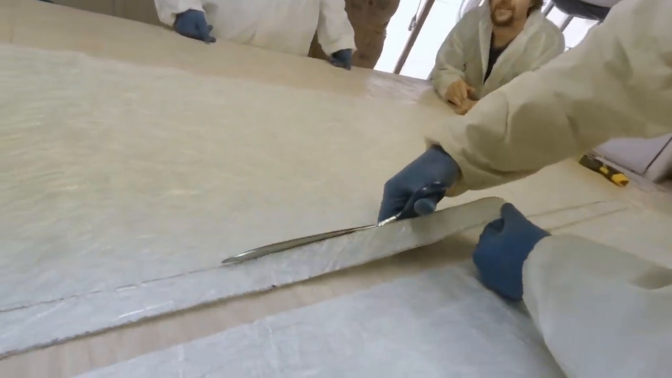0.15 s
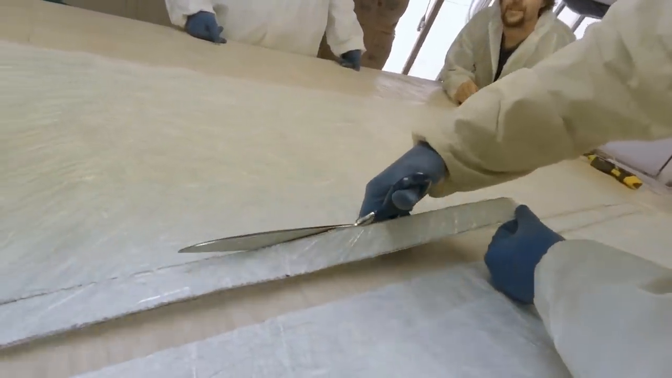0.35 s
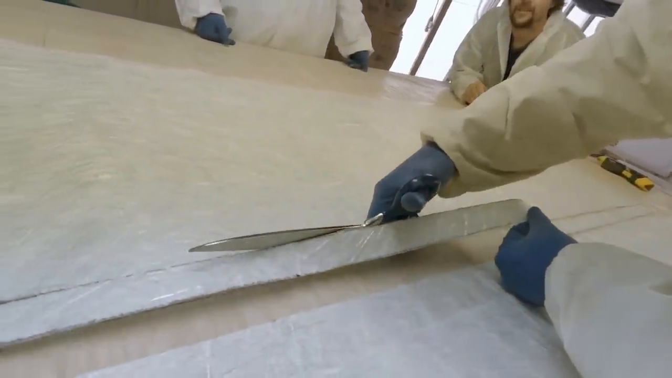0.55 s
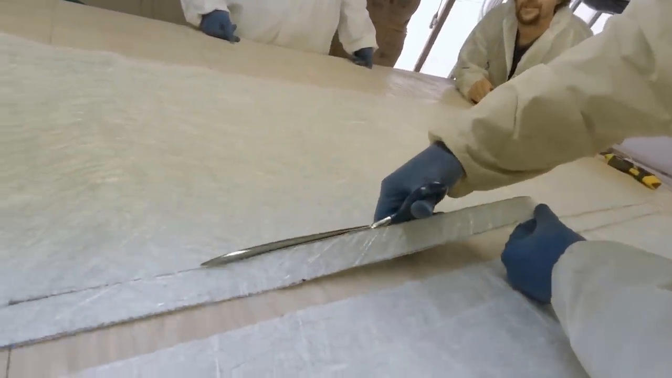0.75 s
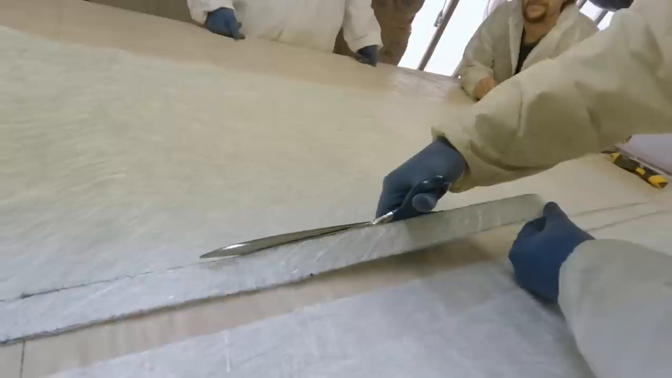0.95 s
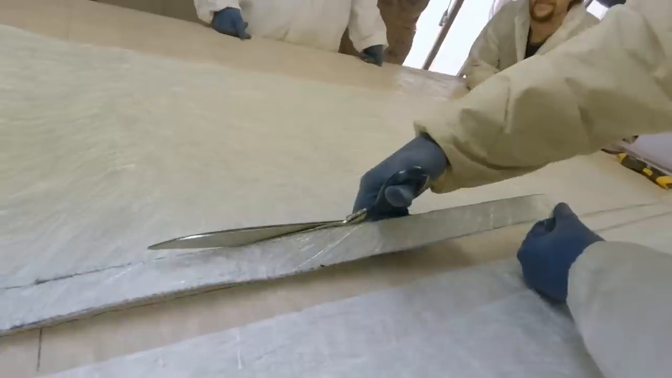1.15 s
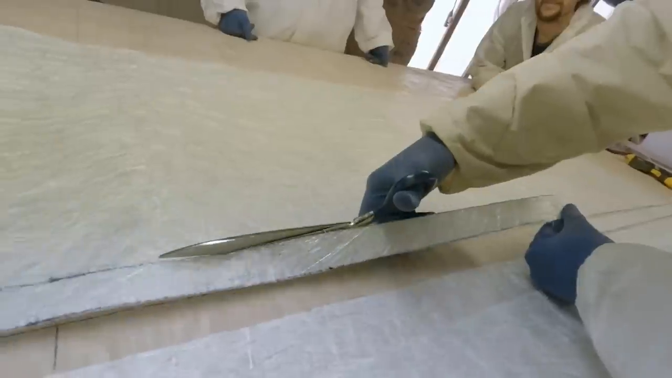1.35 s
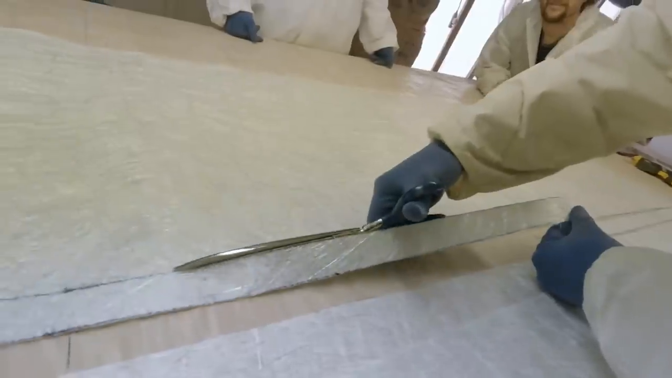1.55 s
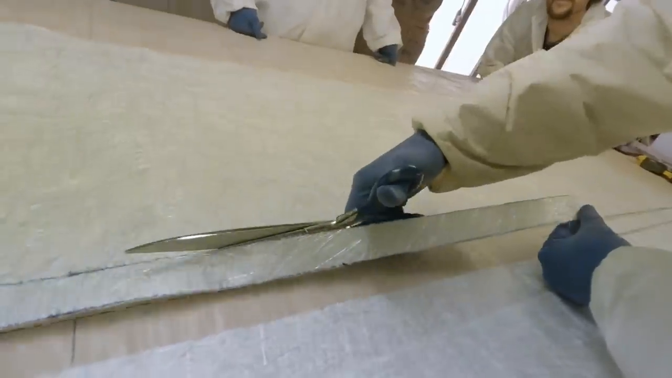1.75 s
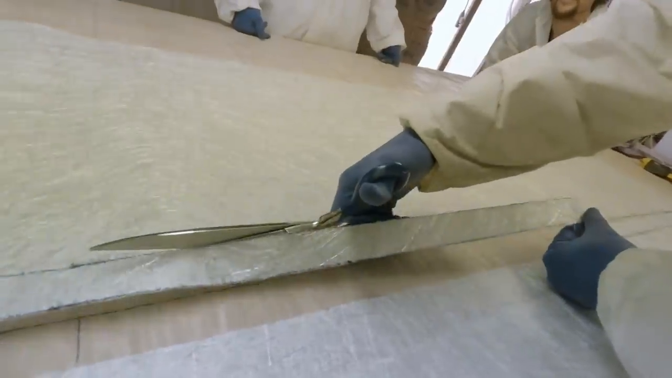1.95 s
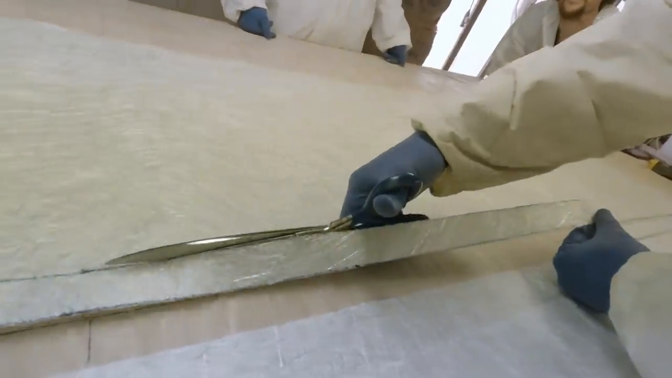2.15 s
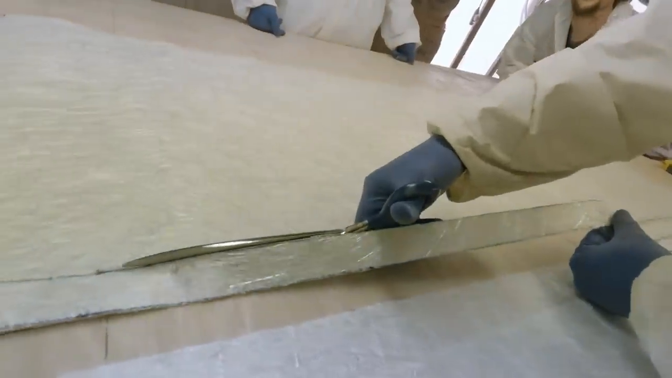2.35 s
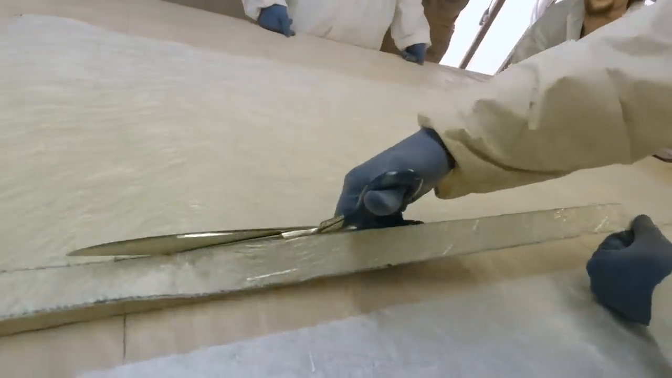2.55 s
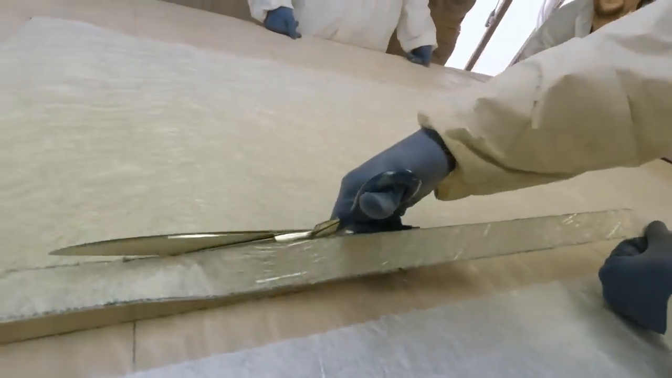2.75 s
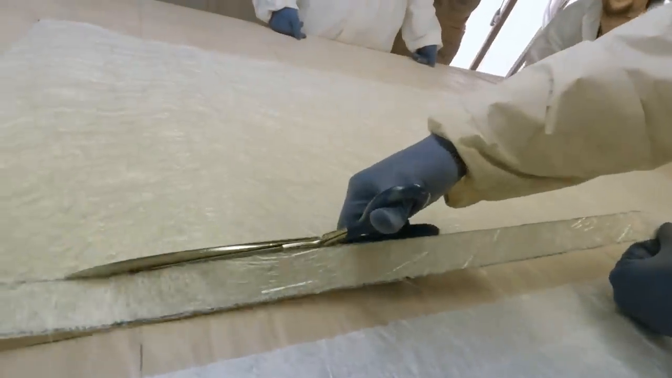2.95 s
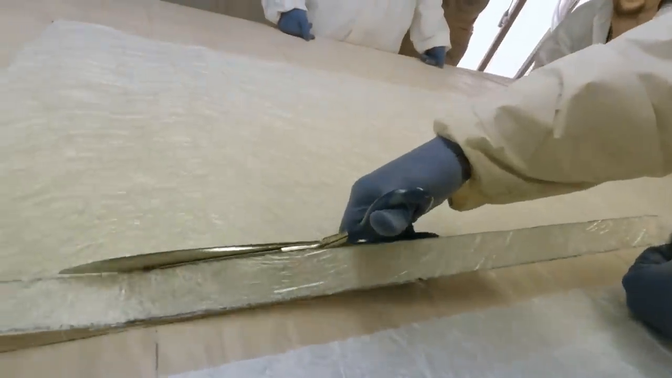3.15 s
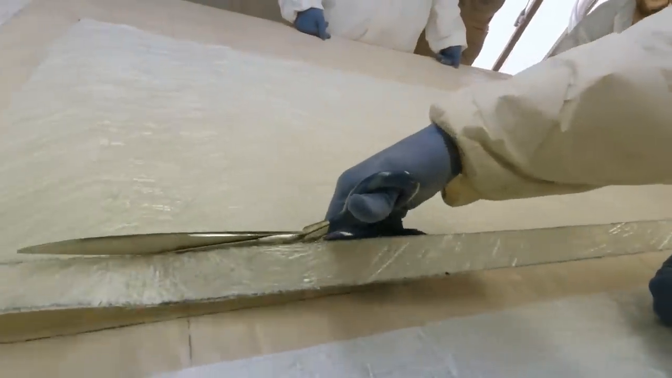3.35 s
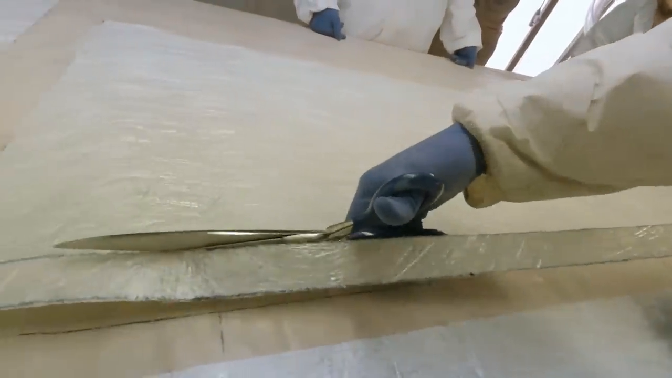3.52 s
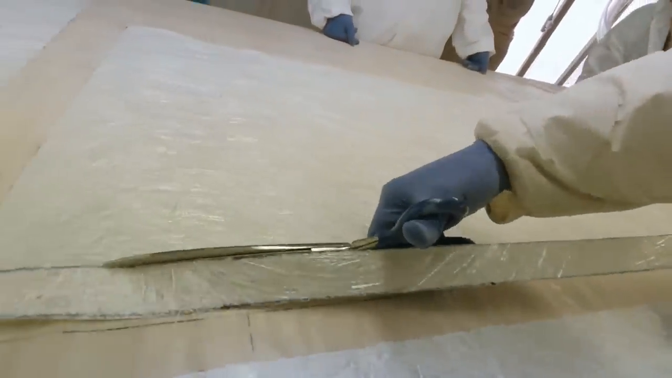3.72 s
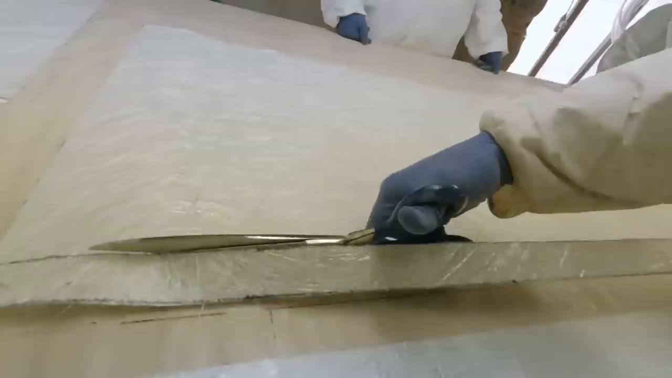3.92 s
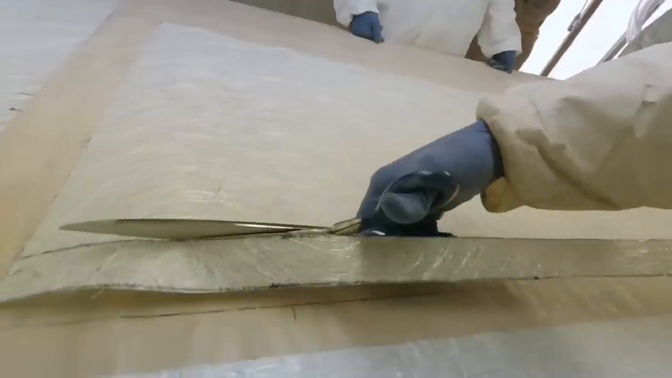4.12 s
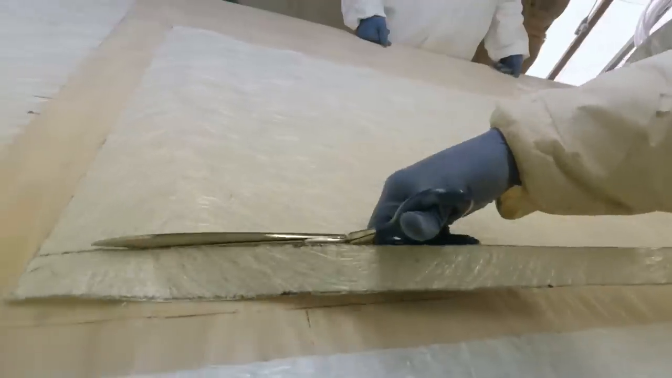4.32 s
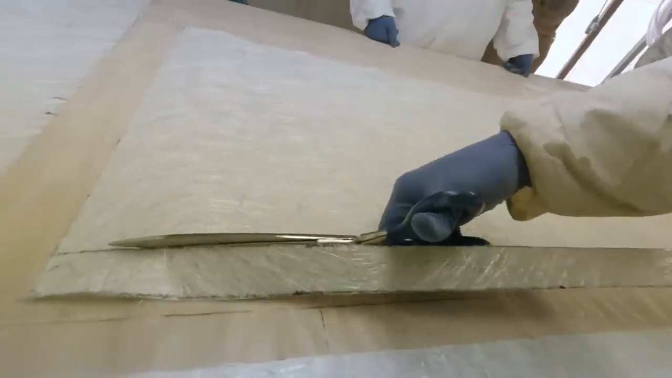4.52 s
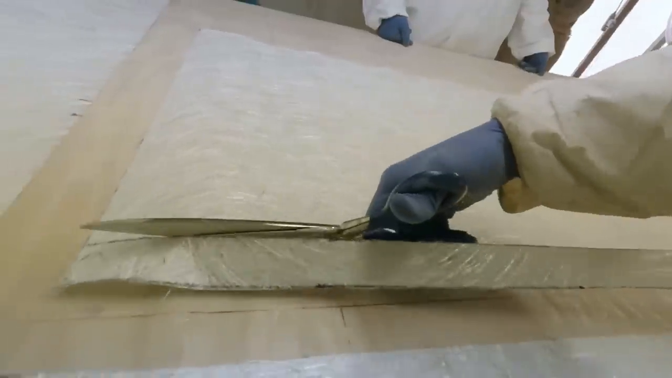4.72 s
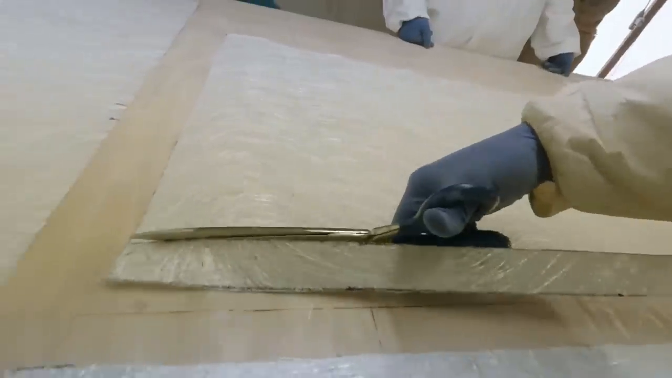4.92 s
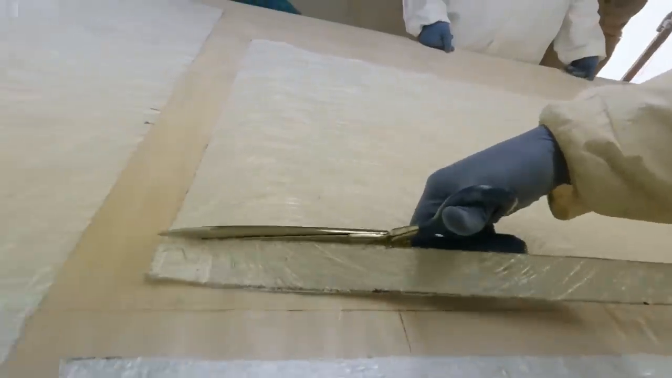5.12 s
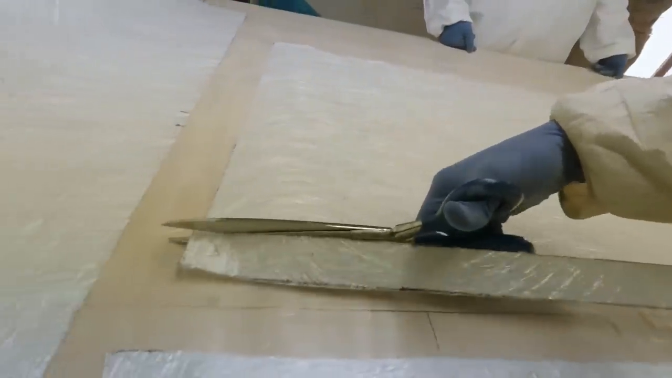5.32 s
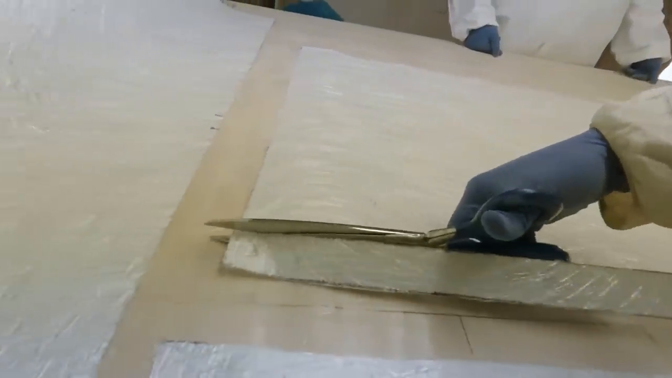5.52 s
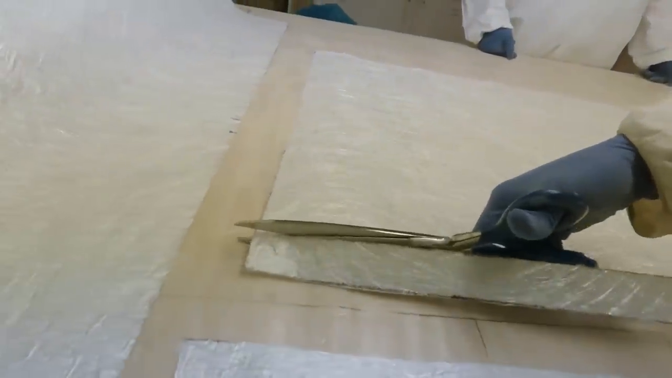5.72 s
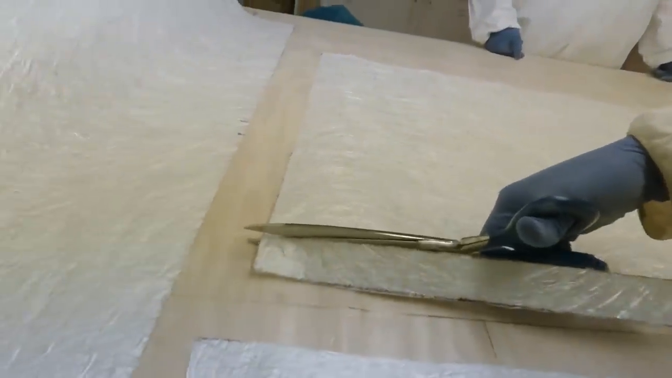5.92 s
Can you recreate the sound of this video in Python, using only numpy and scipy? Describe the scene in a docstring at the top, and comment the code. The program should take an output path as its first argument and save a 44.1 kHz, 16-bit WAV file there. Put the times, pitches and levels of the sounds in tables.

```python
"""Shears cutting a glass-fibre mat

Large tailor's shears cut a strip from a mat lying on a wooden work table, over the low rumble of a shed.
Cutting: showers of random clicks, shaped into crunches, ring in filter banks for blades, mat and table top.
Between strokes the shears open with a hiss and a fading song (denser clicks) and drag over the table.
Knocks and the closing slam, on which the sound ends, are dying sines; ticks and rumble are coloured noise."""
import sys
import numpy as np
from scipy import signal
from scipy.fft import rfft, irfft
from scipy.io import wavfile
from scipy.ndimage import uniform_filter1d, map_coordinates

SR = 44100
rng = np.random.default_rng(int(sys.argv[2]) if len(sys.argv) > 2 else 0)


def generate_wav(sig):
    """Save sig (samples, or channels by samples) to the path in sys.argv[1] as 16-bit PCM at SR."""
    pcm = np.round(np.clip(np.atleast_2d(sig).T, -1, 1) * 32767).astype(np.int16)
    wavfile.write(sys.argv[1], SR, pcm)


N = 267687
TIME = np.arange(N) / SR

# closing strokes, the crossing point of the blades running from pivot to tip:
# (start t/s, end t/s, relative fraying level/dB, push on the table re the cut/dB)
STROKES = [(-.2, 0.035, -41, 1.5), (0.571, 0.788, -43.5, 1), (1.324, 1.468, -43, 4),
           (2.061, 2.246, -42.5, 5), (2.782, 2.987, -43.5, 7), (3.536, 3.693, -43.5, -1),
           (4.246, 4.401, -42.5, -7.5), (4.879, 4.947, -41.5, -13.5), (5.869, 6.035, -46.5, -6)]
# resonances of the table top: (f/Hz, width/Hz, relative level/dB)
TABLE = [(142.4, 12.5, -8.5), (209, 33, 1), (268.8, 34, -0.5), (389, 112, -12.5)]
# spectrum of a bright snap: (f/Hz, relative density/dB)
SNAP = [(1200, -34), (2200, 0.5), (4000, -2.5), (7000, -4.5), (9500, -4.5), (10400, -5), (12500, -7),
        (15500, -9)]


def cutting():
    """One shower of breaking filaments is heard directly and through blades, mat and table."""
    crackle, rasp, push = bundle_levels()
    snaps = grains(per_s=2200, spread_db=3.5)

    direct = from_db(-7.5) * colour(snaps, SNAP)
    bright = even(blades(snaps, flicker_db=4.5) + direct, span_s=0.009)
    board_hz, board_width_hz = 716.4, 48
    board = from_db(board_ring_db()) * resonate(snaps, [(board_hz, board_width_hz, 0)])
    middle = even(mat(snaps, flicker_db=2.5) + board, span_s=0.0056)
    low = even(resonate(snaps, TABLE), span_s=0.011)

    # the lower the band, the longer it lingers and the more it reverberates
    bright = from_db(1.1) * bright * linger(crackle, hold_s=0.00046)
    middle = from_db(-0.77) * middle * linger(rasp, hold_s=.0018)
    low = from_db(0.5) * low * linger(push, hold_s=0.0033)
    return (with_tail(bright, wet_db=-19, t60=0.18)
            + with_tail(middle, wet_db=-9, t60=0.19)
            + with_tail(low, wet_db=-5.5, t60=0.27))


def bundle_levels():
    """Crunches stand over a bed of small bundles fraying; returns strengths of crackle, rasp and push."""
    # thick bundles of fibres giving way; at 5.468 and 5.51 s a faint rustle as the shears shift:
    # (middle t/s, half-length/s, relative level/dB, brightness as crackle over rasp/dB)
    crunches = [(.005, 0.0072, -22, 2), (.018, .006, -28, 0), (0.628, .01, -26.5, 3),
                (0.676, 0.0058, -23, -2), (.72, 0.0073, -23, -5), (0.742, 0.0067, -27, -3),
                (.763, 0.0063, -31, -5), (0.791, 0.0041, -22, -4.5), (1.328, .006, -42, 3),
                (1.359, 0.0043, -33, -0.5), (1.395, 0.0081, -22.5, 2.5), (1.42, .005, -28.5, -4),
                (1.457, 0.011, -25.5, -1.5), (1.492, .008, -23, 1), (1.515, .006, -35, 8),
                (2.108, .006, -29, 0), (2.129, .012, -24, -0.5), (2.179, .009, -20, -1),
                (2.226, 0.0063, -23.5, -5.5), (2.252, 0.007, -26.5, 1.5), (2.279, .0055, -24.5, 0),
                (2.825, 0.01, -27, -2), (2.868, 0.0067, -21.5, 2), (2.93, 0.015, -24, 1.5),
                (2.963, 0.0037, -31, -2), (3.004, 0.0064, -24, 10.5), (3.034, .0075, -38, 6),
                (3.069, .003, -42, 6), (3.545, 0.0054, -34.5, 3), (3.585, 0.006, -31, -3),
                (3.599, 0.0061, -20.5, 1), (3.644, 0.015, -21.5, -2), (3.697, 0.0077, -17.5, -2),
                (4.254, 0.0057, -30.5, -4), (4.289, 0.0088, -22.5, 1), (4.329, 0.015, -24, -0.5),
                (4.361, 0.014, -25.5, -2), (4.394, .006, -26, -3), (4.42, 0.0064, -32, -4.5),
                (4.878, .005, -41, 5), (4.908, .009, -24.5, 3), (4.928, .01, -24, 2),
                (4.948, .008, -22.5, -6), (4.97, .005, -36, 12), (5.468, .006, -52, 10),
                (5.51, .017, -50, 6), (5.881, 0.008, -39, 2), (5.946, 0.0054, -35, -2),
                (5.967, .006, -26.5, -6.5), (6.02, 0.0064, -16.5, 1), (6.052, 0.0034, -22.5, 9)]
    attack_s, release_s = .01, .045   # small bundles fray for as long as the blades close
    fray_per_s, fray_spread_db, fray_hold_s = 150, 2.5, .004   # at random, of unequal size, dying quickly
    fray_bright_db = -3
    crackle_db, rasp_db = -3, 3   # re the level of the cut
    lopsided = .12   # a crunch dies away more slowly than it builds up

    fray = 0
    for start, end, fray_db, _ in STROKES:
        before, after = np.maximum(start - TIME, 0), np.maximum(TIME - end, 0)
        closing = np.exp(-before / attack_s - after / release_s)
        fray = fray + shares(fray_db, fray_bright_db) * closing
    small_snaps = rms_one(linger(grains(fray_per_s, fray_spread_db), fray_hold_s))
    power = (fray * small_snaps) ** 2

    for s, half_length, db, bright_db in crunches:
        near = slice(*np.searchsorted(TIME, [s - 4 * half_length, s + 4 * half_length]))
        age = (TIME[near] - s) / half_length
        swell = np.exp(-(age * (1 - lopsided * np.sign(age))) ** 2)
        power[:, near] += shares(db, bright_db) ** 2 * swell

    crackle, rasp, push = np.sqrt(power)
    push_db = np.interp(TIME, stroke_times(), np.repeat([row[-1] for row in STROKES], 2))
    return from_db(crackle_db) * crackle, from_db(rasp_db) * rasp, from_db(push_db) * push


def shares(db, bright_db):
    """Gains of crackle, rasp and push for this level and brightness, as a column."""
    return from_db([[db + bright_db / 2], [db - bright_db / 2], [db]])


def stroke_times():
    """Start and end of each closing stroke, in turn."""
    return np.ravel([row[:2] for row in STROKES])


def blades(snaps, flicker_db):
    """Which blade modes speak depends on where the edges cross; each also flickers at random."""
    # blade modes, driven differently along the edge:
    # (f/Hz, width/Hz, relative level near the pivot/dB, midway/dB, near the tip/dB)
    edge_modes = [(2336, 170, -19, -17, -8), (2930, 137, -1.5, -3.5, 5), (3700, 330, -2, -2, 3.5),
                  (4370, 170, -10, -5.5, 2), (5485, 470, -2.5, -12, -10), (6350, 140, -3, 4.5, -3.5),
                  (6970, 124, 6, -8.5, -2), (7750, 270, 6, -3.5, 1), (8540, 190, 8.5, 5.5, 4),
                  (8990, 130, 3.5, 5, -2), (9580, 270, -11, -7, -6), (10750, 150, -6, 2.5, -15),
                  (11430, 310, -4.5, -2, -16), (13140, 160, -12, 10, -3), (13400, 230, -8, -1, -6),
                  (13920, 280, 5, 9, -5)]
    travel = np.interp(TIME, stroke_times(), np.tile([0, 1], len(STROKES)))   # 0 pivot, 1 tip
    out = 0
    for k, (hz, width, *along_db) in enumerate(edge_modes):
        db = np.interp(travel, np.array([1, 3, 5]) / 6, along_db)
        gain = (-1) ** k * from_db(db + flicker_db * drift(50)) * np.sqrt(width)
        out = out + gain * resonate(snaps, [(hz, width, 0)])
    return rms_one(out)


def mat(snaps, flicker_db):
    """The stretched mat's modes flicker at random; it is too light to radiate bass."""
    # resonances of the stretched mat: (f/Hz, width/Hz, relative level/dB)
    mat_modes = [(550.7, 48, 4.5), (771, 70, 1), (1045, 56, 3), (1177, 51, 2), (1286, 44, 2),
                 (1454, 66, -2), (1643, 85, -7), (1900, 165, -8.5)]
    out = 0
    for k, (hz, width, db) in enumerate(mat_modes):
        gain = (-1) ** k * from_db(db + flicker_db * drift(35)) * np.sqrt(width)
        out = out + gain * resonate(snaps, [(hz, width, 0)])
    low_hz = 490
    return rms_one(signal.sosfilt(signal.butter(4, low_hz, "high", fs=SR, output="sos"), out))


def board_ring_db():
    """How strongly the bare board answers the lower blade."""
    # the board drums more in the later cuts, as they near the edge of the mat: (t/s, level re the mat/dB)
    board_ring = [(0, -6.5), (2.9, -9.5), (3.6, 0.5), (4.3, 0.5), (4.95, 2.5), (6.0, -0.5)]
    return np.interp(TIME, *np.transpose(board_ring))


def sliding():
    """The blades part, singing at first and then rubbing with a hiss, while the lower one drags on the table."""
    # the shears open and slide on: (start t/s, end t/s, relative blade hiss/dB, relative table drag/dB)
    slides = [(0.147, 0.447, -43.5, -35), (0.927, 1.236, -43.5, -37), (1.634, 1.934, -44.5, -33),
              (2.418, 2.719, -45, -33), (3.118, 3.446, -47.5, -35.5), (3.83, 4.157, -46, -38.5),
              (4.535, 4.806, -49, -48), (5.106, 5.331, -51, -47.5)]
    # the bare edges catch and sing for a moment; at .086 s a small crunch:
    # (middle t/s, half-length/s, relative level/dB)
    catches = [(.086, 0.0053, -51), (1.005, 0.024, -48), (1.71, 0.027, -44.5), (1.87, 0.0087, -43.5),
               (2.488, 0.01, -40.5), (3.152, 0.0084, -42.5), (5.202, .014, -45.5)]
    # spectrum of the rubbing edges: (f/Hz, relative density/dB)
    hiss_spectrum = [(500, -20), (1000, -12), (1600, 0), (2300, -2), (4000, 3), (6000, 2.5), (9000, 1.5),
                     (10500, -2.5), (13500, -0.5), (15500, -4)]
    hiss_ramp_s, drag_ramp_s = 0.042, 0.091   # the hand gathers speed, holds it and slows again
    hiss_waver_db, drag_waver_db, wavers_per_s = 1, 2.5, 31   # the hand is never quite steady
    grit_db, grits_per_s = 1.5, 350   # glass dust between the blades roughens the rub
    board_follows = 0.32   # share of the board ring's dB that the sliding blade also brings out

    hiss, drag, opening = np.zeros((3, N))
    for start, end, hiss_db, drag_db in slides:
        hiss += from_db(hiss_db) * glide(start, end, hiss_ramp_s)
        drag += from_db(drag_db) * glide(start, end, drag_ramp_s)
        opening += ((TIME > start) & (TIME < end)) * (TIME - start) / (end - start)
    hiss *= from_db(hiss_waver_db * drift(wavers_per_s) + grit_db * drift(grits_per_s))
    drag *= from_db(drag_waver_db * drift(wavers_per_s))

    slips = grains(per_s=14000, spread_db=5.5)
    sung = np.clip(np.interp(opening, [.35, .65], [.45, .05]), 0, 1)   # share of power in the free modes

    # the edge's part of the rub comes and goes at random
    edge = resonate(grains(per_s=4000, spread_db=7.0), [(5340, 1100, 0), (7650, 1200, -1)])
    edge = from_db(-10 + 5.9 * drift(20)) * edge
    steel = from_db(-2.5) * hiss * np.sqrt(1 - sung) * (colour(slips, hiss_spectrum) + edge)

    brief = sum(from_db(db) * np.exp(-.5 * ((TIME - s) / half_length) ** 2)
                for s, half_length, db in catches)
    song_level = np.hypot(from_db(-3.5) * hiss * np.sqrt(sung), brief)
    song = song_level * singing(slips, opening, swell_db=6, wander=0.0098, sag=.022)

    board = resonate(slips, [(537, 84, -6), (719, 42, 6), (1055, 69, -4), (1254, 83, -8.5)])
    board = from_db(-2.0 + board_follows * board_ring_db()) * hiss * board
    table = even(resonate(grains(per_s=900, spread_db=3.5), TABLE), span_s=0.036)
    return steel + song + board + from_db(-1.0) * drag * table


def glide(start, end, ramp_s):
    """Speed of the hand, 0 to 1: a ramp up, a hold and a ramp down."""
    return np.clip(np.minimum(TIME - start, end - TIME) / ramp_s, 0, 1)


def singing(slips, opening, swell_db, wander, sag):
    """Free blade modes swell at random; their pitch wavers, and sags midway through each opening."""
    # the blades ringing freely, undamped by the mat: (f/Hz, width/Hz, relative level/dB)
    free_modes = [(2920, 50, -9), (4950, 90, -9), (6290, 87, -3), (8400, 70, 5), (9200, 130, 2.5),
                  (9800, 80, -5), (11750, 90, -0.5), (12850, 110, -6), (13330, 100, 0), (14030, 100, -2)]
    modes = sum(from_db(db + swell_db * drift(26)) * resonate(slips, [(hz, width, 0)])
                for hz, width, db in free_modes)
    bend = wander * drift(22) + sag * np.cos(2 * np.pi * opening)   # relative change of pitch
    position = np.arange(N) + np.cumsum(bend)
    return even(map_coordinates(modes, [position], order=3, mode="mirror"), span_s=0.033)


def bumps():
    """The shears knock on the table: soft blows set its top swinging for a few cycles."""
    # knocks: (t/s, relative level/dB, f/Hz, t60/s)
    knocks = [(0.1351, 0.5, 277, 0.029), (0.138, -24, 100, .15), (0.137, -16, 520, 0.055),
              (0.1502, -13.5, 199, 0.055), (0.153, -16, 422, 0.033), (0.164, -18, 228, .07),
              (0.173, -21.5, 464, 0.032), (1.047, -25.5, 232.4, 0.27), (1.621, -20, 115, 0.19),
              (1.85, -22.5, 237, 0.12), (2.381, -24, 104, 0.14), (3.067, -16, 112, 0.13),
              (5.039, -27.5, 108, 0.13), (5.505, -35, 270, .12)]
    blows = sum(from_db(db) * ring(s, hz, t60, rise_s=0.31 / hz) for s, db, hz, t60 in knocks)
    soft_hz = 950
    soft = signal.sosfilt(signal.butter(3, soft_hz, fs=SR, output="sos"), blows)
    return with_tail(soft, wet_db=-13.0, t60=0.21)


def slam():
    """With no mat left to brake them, the blades close hard on their stop and ring."""
    # the moment of closing: (t/s, level/dB)
    s, level_db = (6.0578, -2)
    # what rings: (f/Hz, relative level/dB, t60/s)
    stop_modes = [(97, -7.5, 0.35), (250, -13, .08), (420, -10, .06), (707, 0.5, 0.053), (1130, -6, 0.044),
                  (1390, -5.5, 0.088), (1850, 3, 0.051), (2303, 1.5, 0.048), (2940, -2.5, 0.029),
                  (3710, -5, 0.045), (4280, -3.5, 0.033), (5710, -13.5, 0.032), (8300, -4.5, 0.027),
                  (13000, -18, .02)]
    rings = sum((-1) ** k * from_db(db) * ring(s, hz, t60) for k, (hz, db, t60) in enumerate(stop_modes))
    return from_db(level_db) * rings


def ticks():
    """Single strands snap and the pivot ticks: bright noise clicks, a few milliseconds long."""
    # clicks: (t/s, relative level/dB)
    clicks = [(0.678, -14), (0.716, -19), (0.788, -16), (0.882, -39), (2.221, -17), (2.275, -20),
              (2.869, -22), (3.284, -28.5), (4.194, -33.5), (4.331, -16), (5.815, -36.5), (5.868, -26)]
    starts, decay_s = np.zeros(N), .003
    for s, db in clicks:
        starts[round(s * SR)] = from_db(db)
    level = signal.lfilter([1], [1, -np.exp(-1 / (decay_s * SR))], starts + 1e-18)
    return from_db(-10.0) * level * colour(rng.standard_normal(N), SNAP)


def shed():
    """The low rumble of the shed: steady noise, strongest in the bass."""
    # spectrum of the rumble: (f/Hz, relative density/dB)
    rumble_spectrum = [(20, -2), (45, -2), (62, 2), (90, 0.5), (140, -8.5), (230, -14), (350, -21),
                       (700, -26), (1100, -31.5), (2000, -34.5), (5000, -37), (15000, -42)]
    level_db = -40.5
    return from_db(level_db) * colour(rng.standard_normal(N), rumble_spectrum)


def grains(per_s, spread_db):
    """Random clicks of very unequal size: single filaments breaking or slipping."""
    sizes = from_db(spread_db * np.minimum(rng.exponential(1, N), 4))
    return (rng.random(N) < per_s / SR) * sizes * rng.choice([-1, 1], N)


def resonate(x, modes):
    """Parallel resonances, each narrowed by a band-pass, signs alternating; rms 1."""
    out = 0
    for k, (hz, width, db) in enumerate(modes):
        r = np.exp(-np.pi * width / SR)   # pole radius
        gain = (-1) ** k * from_db(db) * (1 - r)
        peak = [gain, 0, -gain, 1, -2 * r * np.cos(2 * np.pi * hz / SR), r * r]
        band = [max(hz - 2 * width, hz / 2), min(hz + 2 * width, SR / 2 - 1)]
        skirt = signal.butter(1, band, "band", fs=SR, output="sos")
        out = out + signal.sosfilt(np.vstack([peak, skirt]), x)
    return rms_one(out)


def ring(s, hz, t60, rise_s=0):
    """A sine struck at time s, dying away; a soft blow takes rise_s to build up."""
    out, sounding = np.zeros(N), (TIME > s) & (TIME < s + 2 * t60)
    age = TIME[sounding] - s
    rise = 1 - np.exp(-(age / (rise_s + 1e-9)) ** 2)
    out[sounding] = np.sin(2 * np.pi * hz * age) * from_db(-60 * age / t60) * rise
    return out


def linger(level, hold_s):
    """A heavy body keeps its energy for a moment after the push."""
    r = np.exp(-1 / (hold_s * SR))
    return np.sqrt(signal.lfilter([1 - r], [1, -r], level ** 2 + 1e-18))


def even(x, span_s):
    """Hold the power steady over spans longer than span_s, keeping the finer grain."""
    size = max(int(span_s * SR), 2)
    power = uniform_filter1d(uniform_filter1d(x * x, size), size)
    return x / np.sqrt(np.abs(power) + 1e-6)


def colour(x, spectrum):
    """Give a steady sound a smooth spectrum; rms 1."""
    hz, db = np.transpose(spectrum)
    bins = np.maximum(np.fft.rfftfreq(N, 1 / SR), 1)
    gain = from_db(np.interp(np.log(bins), np.log(hz), db))
    return rms_one(irfft(rfft(x) * gain, N))


def drift(rate):
    """Random values, rate a second, joined by straight lines; 2000 in all, the last one held."""
    knots = rng.standard_normal(2000)
    return np.interp(TIME, np.arange(len(knots)) / rate, knots)


def with_tail(x, wet_db, t60):
    """Add a diffuse tail of decaying noise, which starts a few milliseconds late."""
    age = np.arange(SR // 2) / SR
    echo = rng.standard_normal(len(age)) * from_db(-60 * age / t60) * (age > .006)
    return x + from_db(wet_db) * signal.fftconvolve(x, echo / np.linalg.norm(echo))[:N]


def from_db(db):
    """Decibels to gain."""
    return np.exp(np.asarray(db) * (np.log(10) / 20))


def rms_one(x):
    """Scale to unit power."""
    return x / np.sqrt(np.mean(x ** 2) + 1e-20)


def scene():
    """All is heard from close by, nearly the same in both ears."""
    mid = cutting() + sliding() + bumps() + slam() + ticks() + shed()
    tail = with_tail(mid, wet_db=-33, t60=0.033) - mid
    side = signal.lfilter([1, -.87], [1, -.3], tail)   # very faint, with less bass
    return np.stack([mid + side, mid - side])


def record(dry):
    """The loudest peaks overload, and the top is cut steeply."""
    cutoff_hz = 15750
    low_pass = signal.ellip(10, .1, 80, cutoff_hz, fs=SR, output="sos")
    return signal.sosfilt(low_pass, np.clip(dry, -1, 1))


dry = scene()
out = record(dry)
generate_wav(out)
```